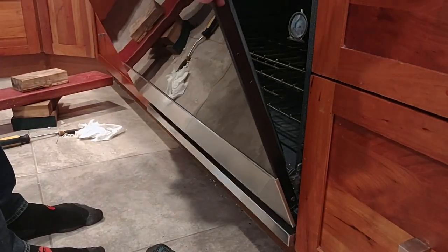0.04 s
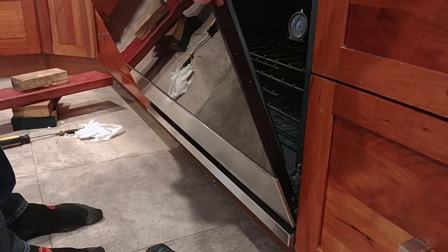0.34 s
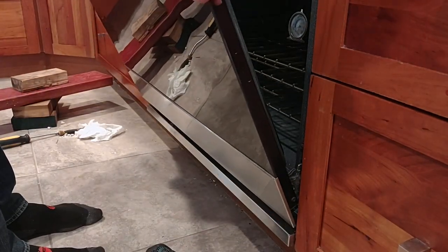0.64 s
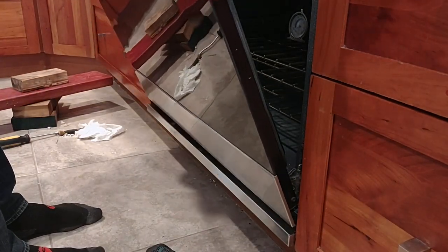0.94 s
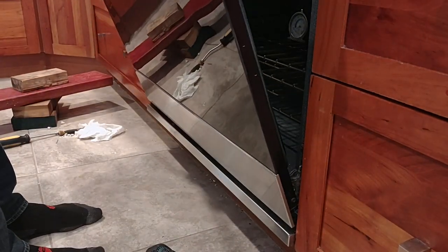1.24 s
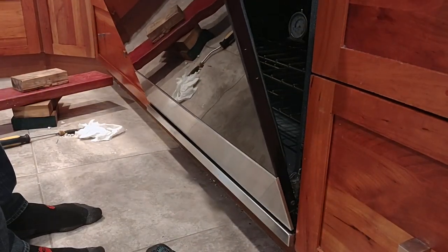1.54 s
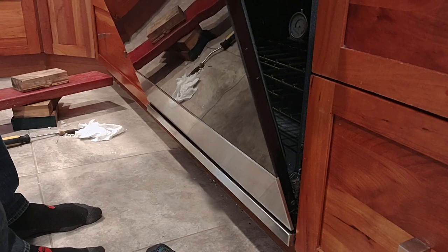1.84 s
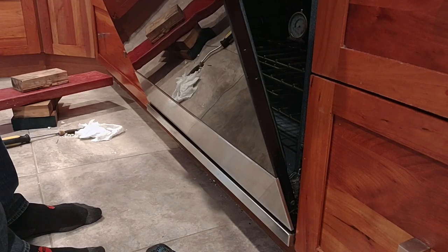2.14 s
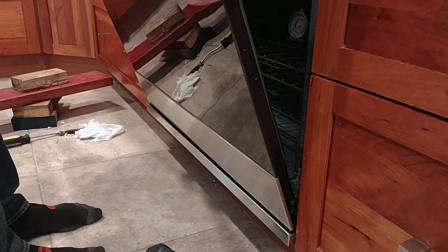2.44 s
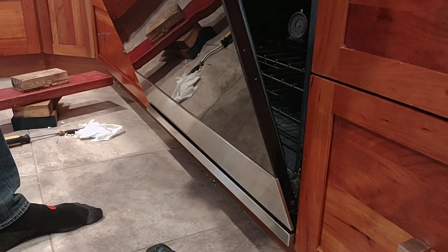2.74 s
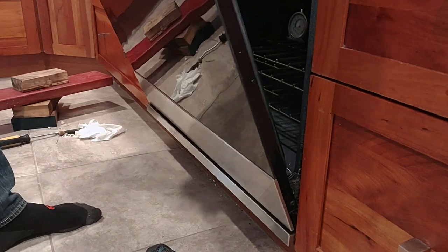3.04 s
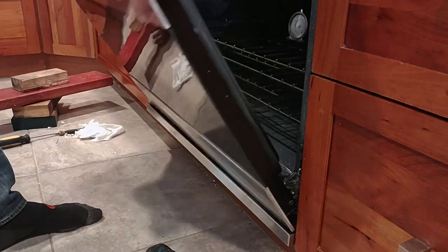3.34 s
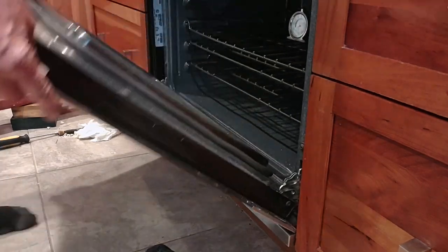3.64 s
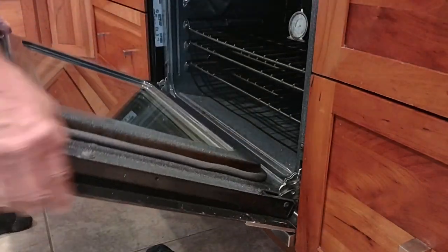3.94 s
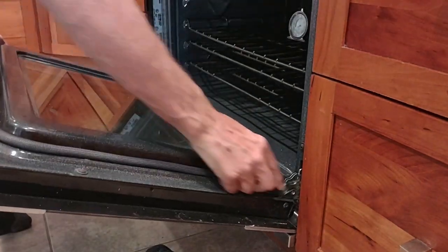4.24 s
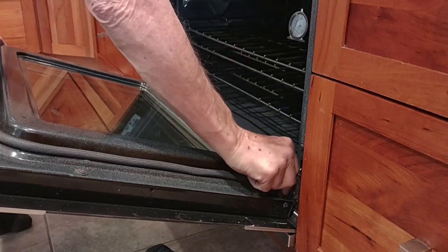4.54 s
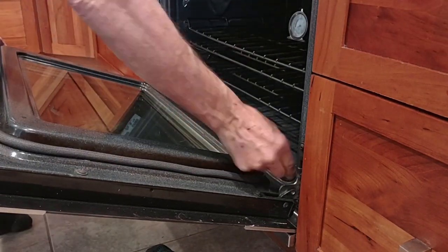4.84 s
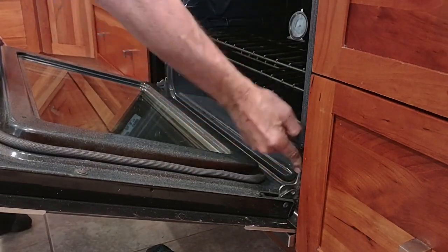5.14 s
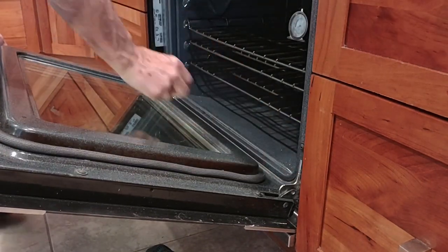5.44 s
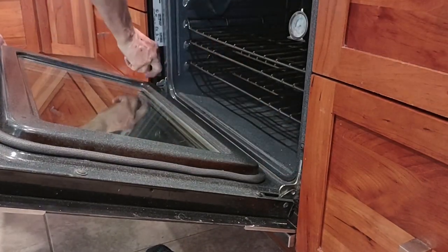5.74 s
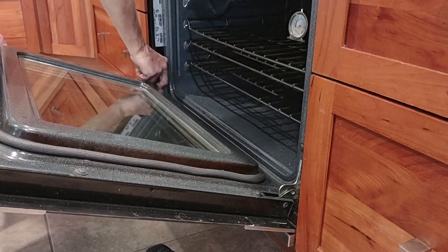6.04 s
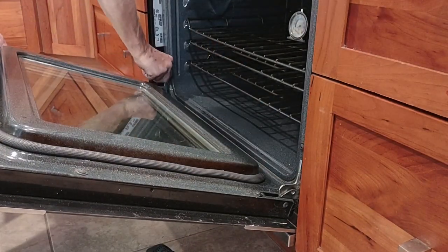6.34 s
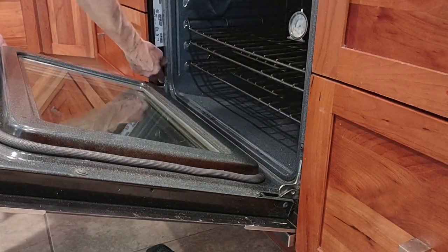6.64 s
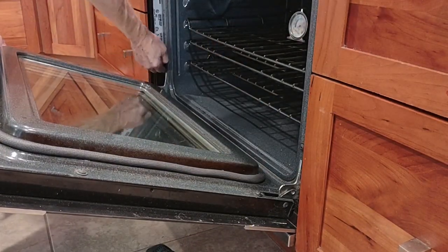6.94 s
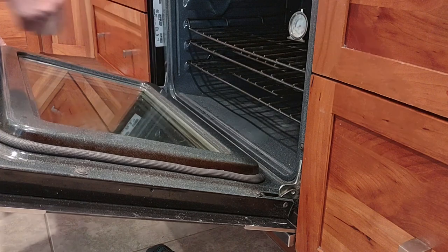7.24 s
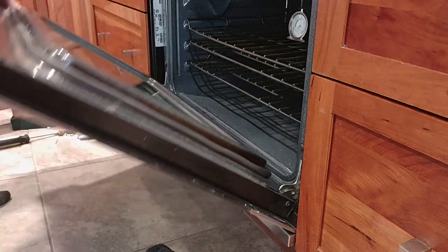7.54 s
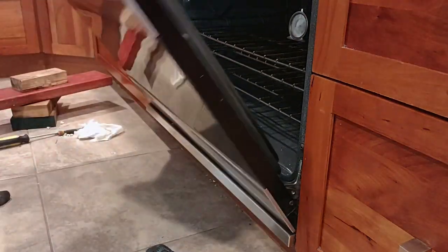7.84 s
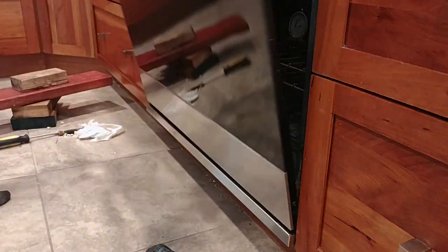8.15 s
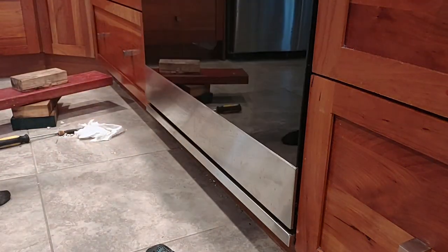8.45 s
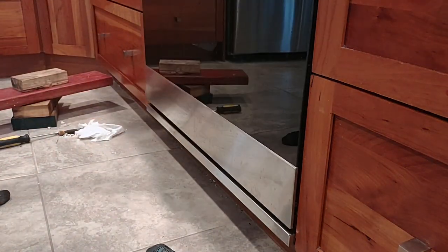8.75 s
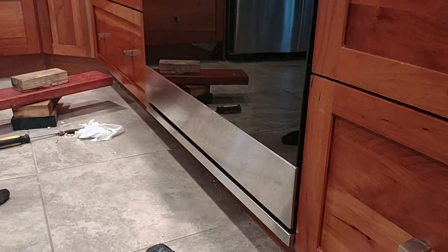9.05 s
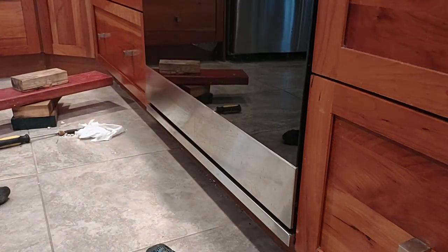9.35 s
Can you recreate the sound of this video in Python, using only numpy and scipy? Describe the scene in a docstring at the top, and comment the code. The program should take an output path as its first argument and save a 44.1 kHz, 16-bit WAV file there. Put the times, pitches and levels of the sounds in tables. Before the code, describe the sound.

A metal oven door knocks and drops onto its hinges with a rattling clunk, then two latches snap over and it bumps shut.

```python
"""Hanging an oven door

In a tiled kitchen an oven door knocks, scrapes and drops home on its hinges, and the racks shiver.
A hinge catches, the door swings down, two steel latches snap over, and the door is swung shut.
Hits are bursts of coloured noise over ringing modes; scrapes and rubs are swells of grit.
Underneath lie a faint room hum and soft rustles, likely of clothing."""
import sys
import numpy as np
from scipy import signal
from scipy.fft import rfft, irfft
from scipy.io import wavfile

SR = 44100
rng = np.random.default_rng(int(sys.argv[2]) if len(sys.argv) > 2 else 0)


def to_wav(sig):
    """Store sig (one row per channel, or 1-D mono) as 16-bit WAV at the path in sys.argv[1].

    Samples outside -1..1 are clipped; the rate is SR.
    """
    pcm = np.clip(np.atleast_2d(sig), -1, 1) * 32767
    pcm = np.round(pcm).astype(np.int16)
    wavfile.write(sys.argv[1], SR, pcm.T)  # frames by channels


N = 422478

# Cue levels are relative: each layer has its own trim.
# the bands of a hit in the kitchen: (low edge [Hz], high edge [Hz], rise [s], base t60 [s])
HIT_BANDS = [(61.6, 160, 0.0059, 0.58), (193, 724, 0.0093, 0.65), (720, 2660, 0.0013, 0.68),
             (3020, 7320, 0.0039, 0.5), (8600, 42000, .003, 0.37)]
# door hits: (time [s], level [dB], bass thump [dB], hardness [dB per band])
DOOR_KNOCKS = [(0.004, -58.5, -58.5, -4.5), (0.251, -34.5, -42, 1.3), (0.465, -61, -42.5, -12),
               (0.725, -42.5, -43.5, 0), (0.841, -46, -45.5, 0.2), (0.946, -47, -44, -1.5),
               (0.968, -37, -37.5, 1), (1.044, -57.5, -32.5, -17.5), (1.361, -51.5, -47, -7),
               (1.385, -22.5, -23.5, 4), (1.416, -23, -34, 2.2), (1.441, -28.5, -25.5, 8),
               (4.29, -70, -74, -4), (5.975, -73.5, -75, -8), (6.382, -70, -67, -2),
               (7.660, -58, -53, -7.5), (8.198, -51.5, -48, -2.5)]
SHUT_AND_REBOUNDS = [(8.38, -34, -37, 4.5), (8.424, -34, -35, -0.5), (8.471, -37, -36, -3.5)]
# hinge catch, near latch, far latch: (time [s], level [dB], bass thump [dB], crack over tail [dB],
# crack t60 [s], own ring [dB], spring [dB], tail length [factor], tail bend [exponent])
SNAPS = [(2.177, -38, -45.5, 11.5, 0.17, -35.5, -72.5, 0.54, 2.93),
         (5.097, -25.5, -51, 7, 0.068, -36, -63.5, 0.77, 1.36),
         (6.889, -26.5, -48.5, 12.5, 0.062, -23.5, -53, 0.78, 1.91)]
# pivots and latches tick under the fingers: (time [s], level [dB], hardness [dB per band])
TICKS = [(3.574, -71, 12), (4.69, -56, -7.5), (4.835, -66, 8.5), (5.505, -63.5, 5), (6.334, -56, -5.5),
         (6.48, -64.5, -1), (6.67, -74.5, -5), (7.349, -77, 13), (7.659, -64, 11)]
# EQ of each kind of hit: (body [dB], mid [dB], treble [dB], top [dB])
SNAP_TONES = [(-4, 0, 11.5, -5), (-10.5, 0, -3.5, -8.5), (-13.5, 0.014, 6, 6)]
KNOCK_TONE, SHUT_TONE, TICK_TONE = (-1, 0.5, -14.5, -25), (-2.5, 0, -0.5, -13), (-14.5, 2.5, -3, -10.5)
# sliding moves: (peak time [s], level [dB], swell [s], fade [s])
ARM_SCRAPES = [(.68, -56.5, 0.017, 0.027), (.85, -35, 0.059, 0.056), (.98, -32.5, 0.036, 0.095),
               (1.33, -57, .02, 0.037), (2.8, -59.5, 0.39, 0.088)]
PIVOT_RUBS = [(3.69, -52, 0.031, 0.03), (3.78, -64.5, 0.25, 0.22), (4.27, -72.5, 0.16, 0.086),
              (5.098, -47, 0.011, 0.018), (6.86, -62.5, .015, .04), (6.892, -34, .007, 0.012),
              (8.9, -69, 0.16, 0.14)]
RUSTLES = [(1.9, -74, 0.13, 0.39), (2.43, -66.5, .03, 0.093), (2.8, -64, 0.34, 0.14),
           (3.68, -61.5, .15, .11), (4.3, -68.5, .06, 0.059), (4.6, -71, 0.97, 0.69),
           (5.4, -55.5, 0.013, 0.044), (5.72, -62.5, 0.133, 0.23), (6.03, -69, 0.14, 0.43),
           (7.35, -62, .1, 0.16), (8.2, -67.5, 0.16, 0.11), (8.92, -80, 0.21, 0.18),
           (9.29, -66.5, .13, 0.093), (9.57, -67.5, .07, 0.076)]
# short bright swishes: (time [s], level [dB])
SWISHES = [(1.536, -39), (1.756, -50.5), (2.342, -46.5), (2.81, -56), (8.252, -47.5)]
# the colour of each source: (frequency [Hz], level [dB])
DOOR_COLOUR = [(29, -67), (50, -13.5), (85, -6.5), (193, -10.5), (507, -7.5), (646, -18.5), (927, -16.5),
               (997, -20), (1580, -21), (2490, -24), (3950, -23.5), (7760, -24), (16000, -38)]
FRAME_COLOUR = [(29, -25), (50, -24), (96, -22), (223, -25.5), (277, -34), (439, -21), (694, -32),
                (905, -16), (1470, -7.5), (2380, -12.5), (5950, -28.5), (10100, -14.5), (16000, -20)]
CATCH_COLOUR = [(41, -34), (70, -17.5), (239, -7.5), (293, 1), (431, -7), (506, 2.5), (727, -8.5),
                (853, -3), (1510, -5.5), (1730, -9.5), (2070, -18.5), (2370, -18.5), (3330, -36.5),
                (6020, -29.5), (16000, -32.5)]
NEAR_LATCH_COLOUR = [(59, -34.5), (100, -17), (197, -16.5), (229, -22), (266, -13), (381, -10.5),
                     (595, -5.5), (648, -12), (970, -1.5), (1450, -3.5), (1650, -3), (1830, -5.5),
                     (3780, -14.5), (7450, -12.5), (16000, -35.5)]
FAR_LATCH_COLOUR = [(59, -29.5), (100, -9), (249, -24), (502, -6), (621, -17), (1060, -12.5), (1170, -10),
                    (1800, -7), (3050, -10.5), (3700, -5), (5530, -7), (6560, 0), (7940, -2.5),
                    (10200, -0.5), (16000, -9.5)]
PIVOT_COLOUR = [(290, -35), (500, -4.5), (684, -24), (1050, -5), (1580, -7), (1710, -4), (3350, -17),
                (3590, -16), (8000, -18), (10400, -62.5), (17600, -120)]
RUSTLE_COLOUR = [(1470, -28.5), (2500, 2), (3460, -1), (6760, 3), (12000, 0), (14400, -4.5), (16000, -7)]
ROOM_COLOUR = [(15, -47), (25, -26.5), (87, -2), (161, -2), (200, -9.5), (223, -3.5), (405, -8.5),
               (503, -3), (641, -12.5), (936, -11.5), (1040, -14.5), (1260, -13), (3080, -23.5),
               (7920, -24.5), (16000, -34)]
# broad resonances of door and cavity, and of the hinges: (frequency [Hz], width [Hz], lift [dB])
OVEN_BODY = [(69, 15, 17.5), (86.9, 5.1, 1.5), (122, 25, 11.5), (160, 9.8, 5), (267.3, 31, 9.5),
             (326, 10, 6), (436, 15, 4.5), (533.4, 45, 1), (565.5, 19, 4.5), (892, 38, 6), (2350, 500, 3.5)]
HINGE_STEEL = [(524, 30, -2), (970, 70, 3.5), (1200, 120, 2), (1975, 150, 5.5), (3570, 62, 3),
               (6300, 540, 2.5), (9750, 300, -3)]
# ringing modes: (frequency [Hz], level [dB], t60 [s])
PANEL_MODES = [(70, -17.5, 0.25), (86.8, -4, 0.29), (120, -5, .22), (143.4, -3.5, 0.3)]
CATCH_MODES = [(539, 1, 0.32), (903, 5.4, 0.094)]
NEAR_LATCH_MODES = [(586, -4, 1.01), (1069, -17.5, 0.53), (1160, -26, 4.6), (1880, 7.5, 0.41)]
FAR_LATCH_MODES = [(3660, -7.5, 0.24), (6440, -11, .25), (8764, -10, .35), (9722, -15.5, .3),
                   (10060, -13.5, .35), (12100, -9.5, .28)]
SPRING_MODES = [(453, -1, 2.9), (1270, 1.5, 1.6), (2180, -4, 1.6), (2375, 8.5, 1.9), (2590, -2.5, 0.57),
                (2930, -2, 3.5), (3250, 1.5, 2.6), (6760, -6.5, 1.0), (10200, -8.5, .9)]
RACK_MODES = [(358, 1, 1.2), (443, -15, 0.7), (510, 0, 2.2), (582, 0, 4.4), (830, -2.5, 2.5),
              (1124, -7, 0.65), (1206, 0.5, 1.69), (1322, -4, 1.8)]
# stereo image, wider on top for the snaps: (frequency [Hz], side against mid [dB])
WIDTH = [(85, -27.5), (170, -8.5), (350, -9.5), (700, -3.5), (1400, -0.5), (6800, -1), (9000, -22.5),
         (14000, -15.5)]
SNAP_WIDTH = [(85, -22.5), (200, -10), (400, -10.5), (700, -4), (1400, -1.5), (6800, -1), (9000, -9.5),
              (14000, -6.5)]

DROP_S, STEADIED_S, SHUT_S = 1.42, 2.99, 8.5  # the door drops home, is steadied, is shut


def amp(db):
    """Decibels to gain."""
    return 10 ** (np.asarray(db) / 20)


def unit(x):
    """Scales to rms 1."""
    return x / np.sqrt(np.mean(x ** 2) + 1e-20)


def curve(points, hz):
    """Reads a curve on a log-frequency axis."""
    f, value = np.transpose(points)
    return np.interp(np.log(hz + 1), np.log(f + 1), value)


def add(mix, s, sound):
    """Lays a stereo sound into the mix at s seconds."""
    part = mix[:, max(round(s * SR), 0):][:, :sound.shape[1]]
    part += sound[:, :part.shape[1]]


def band(x, low_hz, high_hz, order=6):
    """Keeps one band, with soft edges."""
    hz = np.fft.rfftfreq(x.shape[1], 1 / SR) + 1
    skirts = (1 + (low_hz / hz) ** (2 * order)) * (1 + (hz / high_hz) ** (2 * order))
    return irfft(rfft(x) / np.sqrt(skirts), x.shape[1])


def grit(size, colour, resonances=(), rough_db=0, ripple_db=0, width=WIDTH):
    """Stereo noise of uneven grains, coloured by broad resonances and a ripple of narrow ones."""
    grains = rng.standard_normal((2, size)) * amp(rough_db * rng.standard_normal(size))
    hz = np.fft.rfftfreq(size, 1 / SR)
    lifts_db = sum(db / (1 + (2 * (hz - f) / span) ** 2) for f, span, db in resonances)
    ripple = np.interp(hz, np.geomspace(300, 16000, 420), rng.uniform(-0.64, 1, 420), left=0)
    mid, side = rfft(grains) * amp(curve(colour, hz) + lifts_db + ripple_db * ripple)
    side = side * amp(curve(width, hz))
    return unit(irfft([mid + side, mid - side], size))


def ring(modes, detune=0, width=1, rise=0.001, count=1):
    """Decaying partials or beating clusters, spread by left-right phase and faded out over 1.5 s."""
    t = np.arange(round(1.5 * SR)) / SR
    out = 0
    for hz, db, t60 in modes:
        offset, phase, lead = rng.uniform(-1, 1, (3, count, 1))
        partials = np.exp(1j * (2 * np.pi * hz * (1 + detune * offset) * t + np.pi * phase))
        stereo_phase = np.exp(1j * width * np.array([lead[:, 0], -lead[:, 0]]))
        out = out + amp(db - 60 * t / t60) * (stereo_phase @ partials).real
    return out * (1 - np.exp(-t / rise)) * (1 - t / t[-1]) / np.sqrt(count)


def band_levels(level_db, thump_db, tone, hardness_db=0):
    """A hit's dB per band: weight sets the bass, hardness tilts the rest about the mids."""
    return [thump_db] + [level_db + db + hardness_db * step for step, db in enumerate(tone, -1)]


def hit(metal, levels, crack_db, crack_t60, linger, bend):
    """Crowded metal modes, struck: a crack, then a tail that linger stretches and bend > 1 curves down."""
    t = np.arange(SR) / SR
    crack = amp(crack_db - 60 * t / crack_t60)
    out = 0
    for (low_hz, high_hz, rise, t60), db in zip(HIT_BANDS, levels):
        tail = amp(-60 * (t / (t60 * linger)) ** bend)
        attack = 1 - np.exp(-(t / rise) ** 2)
        part = band(metal, low_hz, high_hz) * (crack + tail) * attack
        out = out + amp(db) * part / np.std(part[:, :SR // 20])  # level set on the first 50 ms
    return out


def strokes(rows, roundness=1.5):
    """Envelope of sliding moves, each swelling to its peak and fading."""
    t = np.arange(N) / SR
    return sum(amp(db) * np.exp(-(abs(t - s) / np.where(t < s, swell, fade)) ** roundness)
               for s, db, swell, fade in rows)


def excited(start, db, fall_db_per_s, rise=0.018):
    """Envelope of a vibration that is set off once and falls at a steady rate."""
    t = np.maximum(np.arange(N) / SR - start, 0)
    return amp(db - fall_db_per_s * t) * (1 - np.exp(-t / rise))


def door():
    """The door knocks in its frame, and at last shuts and rebounds."""
    out = np.zeros((2, N))
    for s, db, thump_db, hardness_db in DOOR_KNOCKS:
        metal = grit(SR, DOOR_COLOUR, OVEN_BODY, ripple_db=8)
        levels = band_levels(db, thump_db, KNOCK_TONE, hardness_db)
        add(out, s, amp(-5) * hit(metal, levels, crack_db=4.5, crack_t60=0.17, linger=0.84, bend=1.37))
        add(out, s, panel_thud(thump_db - 1))
    for s, db, thump_db, hardness_db in SHUT_AND_REBOUNDS:
        metal = grit(SR, FRAME_COLOUR, OVEN_BODY, ripple_db=6)
        levels = band_levels(db, thump_db, SHUT_TONE, hardness_db)
        add(out, s, amp(-4.5) * hit(metal, levels, crack_db=6, crack_t60=0.019, linger=0.79, bend=0.8))
        add(out, s, panel_thud(thump_db + 12))
    return out


def panel_thud(thump_db):
    """The door panel flexes in its lowest modes, too small to radiate the deepest bass."""
    t = np.arange(SR) / SR
    flex = sum(amp(db - 60 * t / t60) * np.sin(2 * np.pi * hz * t) for hz, db, t60 in PANEL_MODES)
    attack = 1 - np.exp(-(t / 0.02) ** 2)
    thud = signal.sosfilt(signal.butter(4, 62, "highpass", fs=SR, output="sos"), flex * attack)
    return amp(thump_db) * np.array([thud, thud])


def hinge_snaps():
    """The catch and each latch snap over, ring in their own steel and set the door spring singing."""
    out = np.zeros((2, N))
    colours = CATCH_COLOUR, NEAR_LATCH_COLOUR, FAR_LATCH_COLOUR
    mode_sets = CATCH_MODES, NEAR_LATCH_MODES, FAR_LATCH_MODES
    for snap, tone, colour, modes in zip(SNAPS, SNAP_TONES, colours, mode_sets):
        s, db, thump_db, crack_db, crack_t60, ring_db, spring_db, linger, bend = snap
        steel = grit(SR, colour, HINGE_STEEL, ripple_db=7, width=SNAP_WIDTH)
        levels = band_levels(db, thump_db, tone)
        add(out, s, amp(-1) * hit(steel, levels, crack_db, crack_t60, linger, bend))
        add(out, s, amp(ring_db) * ring(modes, width=0.94))
        add(out, s, amp(spring_db) * spring())
    return out


def spring():
    """The door spring sings in crowded coil modes over a dying shimmer of sheet metal."""
    t = np.arange(round(1.5 * SR)) / SR
    sheet = unit(band(grit(len(t), NEAR_LATCH_COLOUR, ripple_db=15.5), 350, 3400))
    envelope = amp(2 - 60 * t / 2.8) * (1 - t / t[-1]) * (1 - np.exp(-t / 0.01))
    return ring(SPRING_MODES, detune=0.05, width=0.8, count=16) + sheet * envelope


def latch_ticks():
    """Pivots and fingered latches tick, each with a small steel ring."""
    out = np.zeros((2, N))
    for s, db, hardness_db in TICKS:
        steel = grit(SR, NEAR_LATCH_COLOUR, [(1200, 200, 12.8), (497.5, 90, 7.9)], ripple_db=5)
        levels = band_levels(db, db - 13.5, TICK_TONE, hardness_db)
        add(out, s, amp(-7.5) * hit(steel, levels, crack_db=-2, crack_t60=0.07, linger=0.76, bend=0.85))
        add(out, s, amp(db - 7) * ring([(1210, 0, 0.7)], detune=0.11, count=12))
    return out


def hinge_friction():
    """The hinge arms scrape into their slots; later the pivots and latches rub as they turn."""
    scrape = band(grit(N, DOOR_COLOUR, OVEN_BODY, rough_db=4.2, ripple_db=8.5), 350, 1480, order=3)
    rub = grit(N, PIVOT_COLOUR, HINGE_STEEL, rough_db=4.7, ripple_db=4.5)
    return unit(scrape) * strokes(ARM_SCRAPES) + rub * strokes(PIVOT_RUBS)


def racks_and_panels(contacts_per_s=70, damping_db_per_s=33):
    """Racks shiver from the drop until a hand steadies the door; once it shuts, the panels drone."""
    contacts = rng.standard_normal(N) * (rng.random(N) < contacts_per_s / SR)
    wires = signal.fftconvolve(contacts[None], ring(RACK_MODES, width=0.89), axes=1)[:, :N]
    cavity = band(grit(N, DOOR_COLOUR, OVEN_BODY, rough_db=4.2, ripple_db=9.5), 420, 1550, order=3)
    panel = grit(N, DOOR_COLOUR, OVEN_BODY, rough_db=1.4)
    shiver = amp(-8) * unit(wires) + amp(-4) * unit(cavity) + amp(-8.5) * unit(band(panel, 88.4, 200))
    shiver *= excited(DROP_S, db=-35.5, fall_db_per_s=18.5)
    steadied = amp(-damping_db_per_s * np.maximum(np.arange(N) / SR - STEADIED_S, 0))
    drone = excited(SHUT_S, db=-49.5, fall_db_per_s=37.5)
    held_hum = excited(SHUT_S, db=-67.5, fall_db_per_s=0)
    return shiver * steadied + unit(band(panel, 132, 190)) * (drone + held_hum)


def rustles():
    """Soft swells of grainy hiss, like clothing, with a few brighter swishes."""
    cloth = grit(N, RUSTLE_COLOUR, rough_db=4.2)
    bright = unit(band(grit(N, RUSTLE_COLOUR, rough_db=0.98), 5500, 19000, order=1))
    swishes = 0
    for s, db in SWISHES:
        t = np.maximum(np.arange(N) / SR - s, 0)
        swishes = swishes + amp(db) * (t / 0.024) * np.exp(1 - t / 0.019)
    return cloth * strokes(RUSTLES) + bright * swishes


def room_hum():
    """A faint, steady bed of dark noise."""
    return amp(-67.5) * grit(N, ROOM_COLOUR, resonances=[(120.2, 23, 1.6), (270, 25, 3), (500, 58, 2)])


def scene():
    """The oven up front, rustles and room behind."""
    oven = door() + hinge_snaps() + latch_ticks() + hinge_friction() + racks_and_panels()
    return oven + rustles() + room_hum()


def record(dry, cutoff_hz=16100):
    """A steep low-pass trims the very top of the mix."""
    lowpass = signal.firwin(511, cutoff_hz, window=("kaiser", 9), fs=SR)
    return signal.oaconvolve(dry, lowpass[None], "same")


dry = scene()
out = record(dry)
to_wav(out)
```